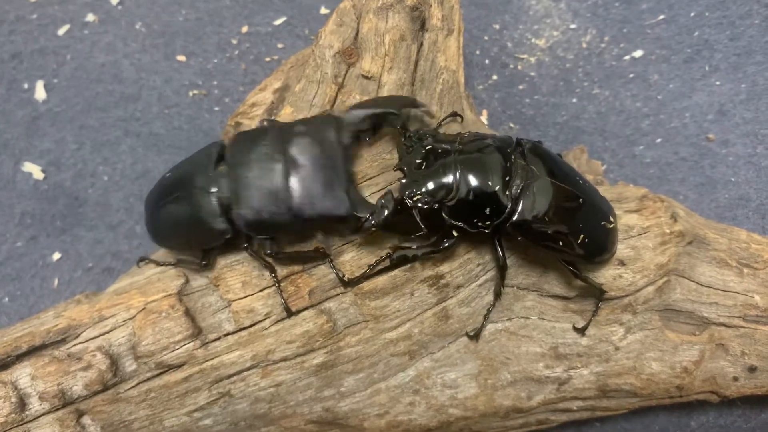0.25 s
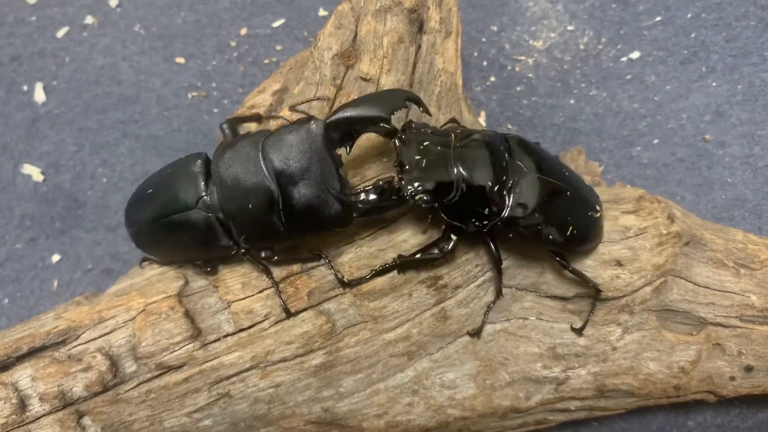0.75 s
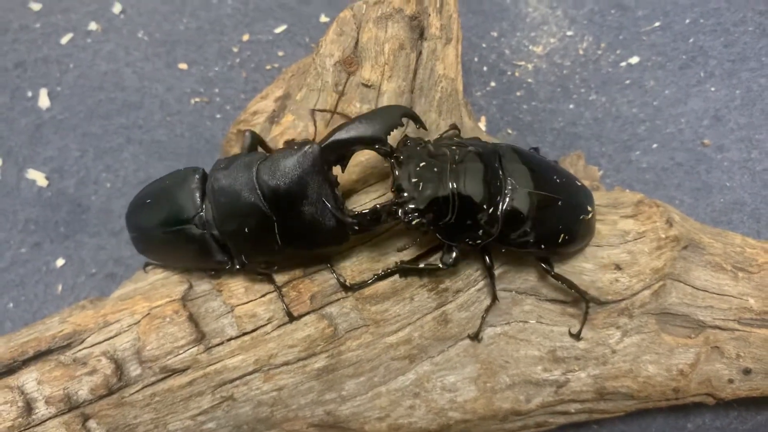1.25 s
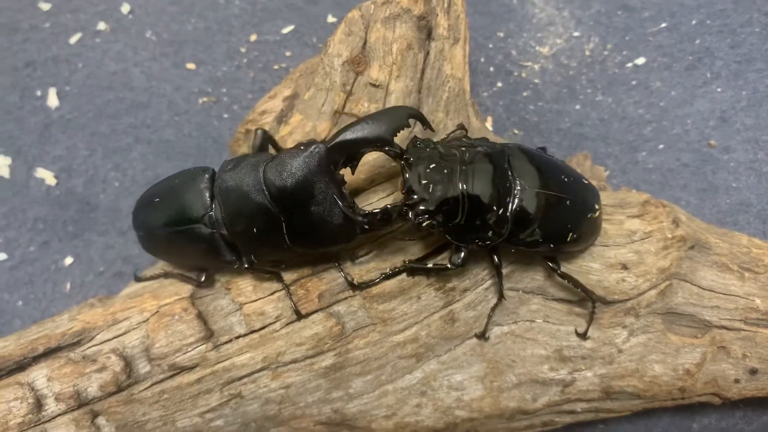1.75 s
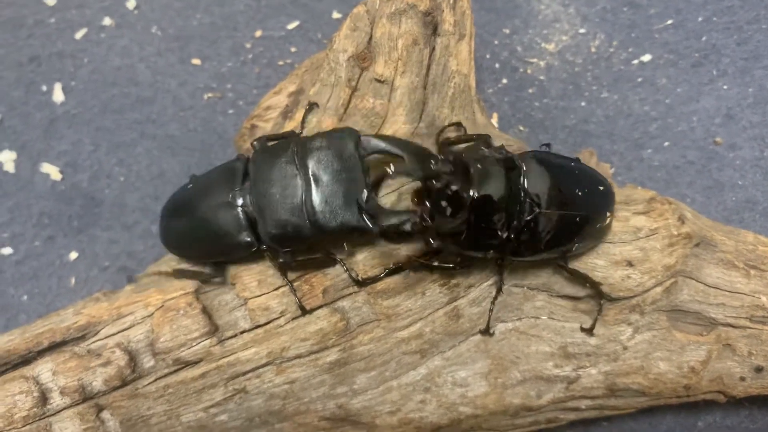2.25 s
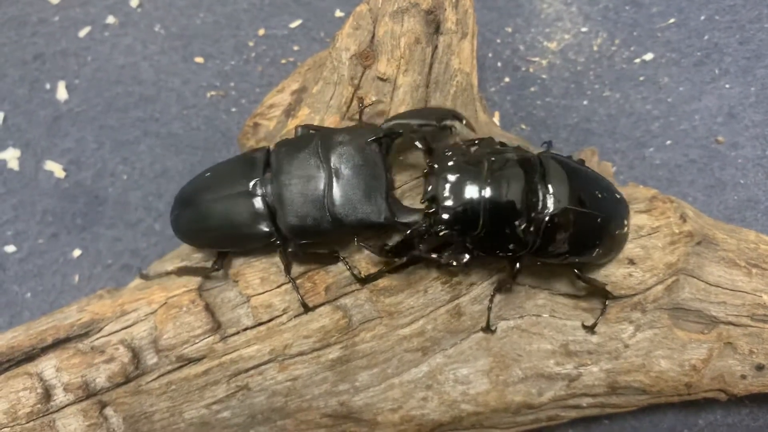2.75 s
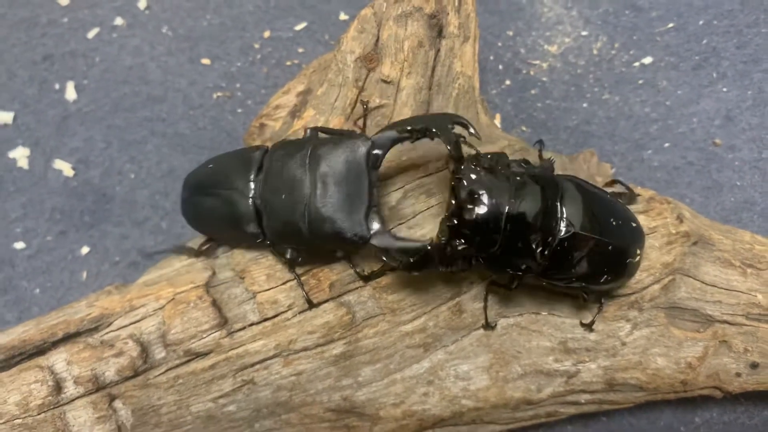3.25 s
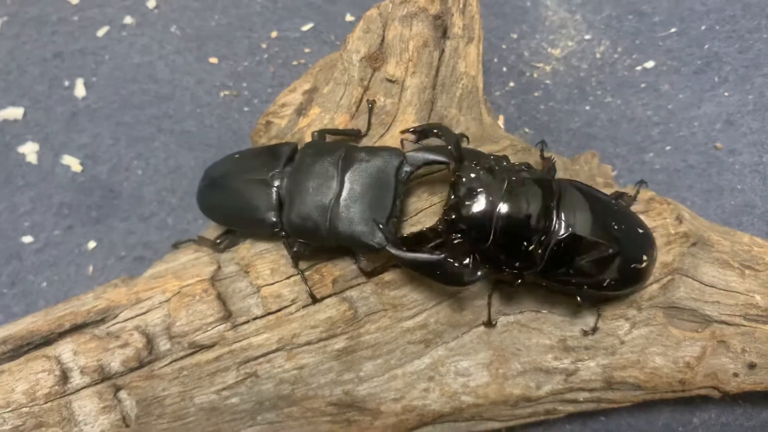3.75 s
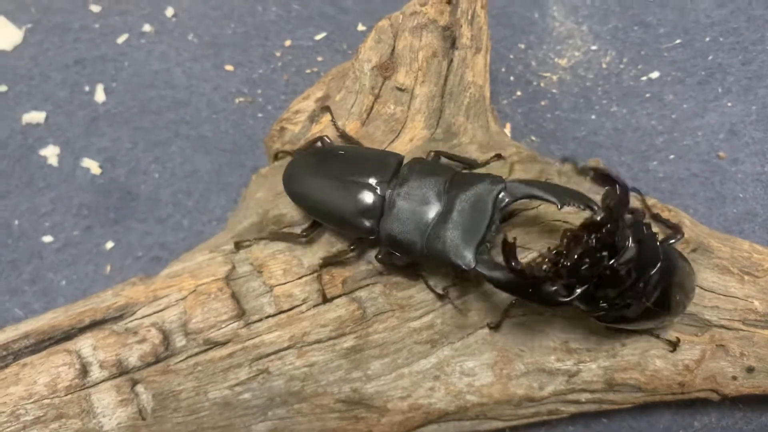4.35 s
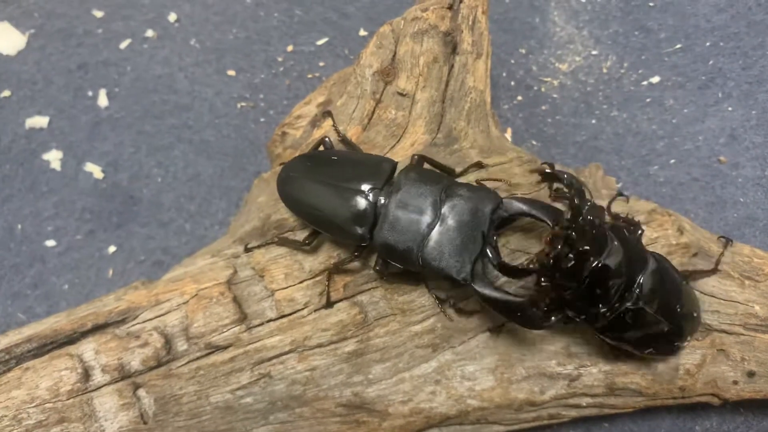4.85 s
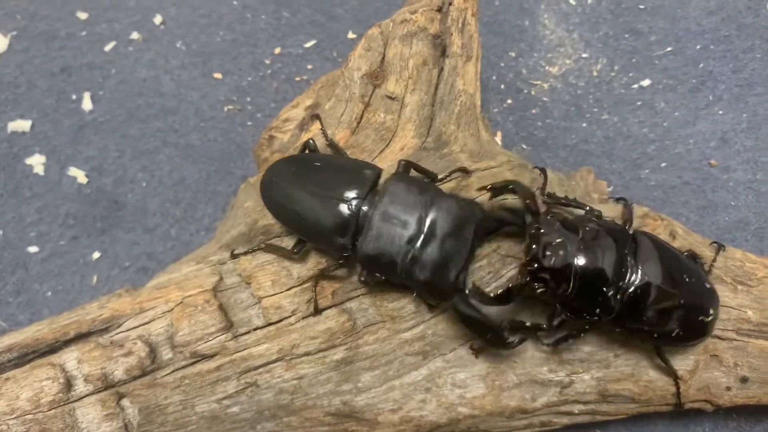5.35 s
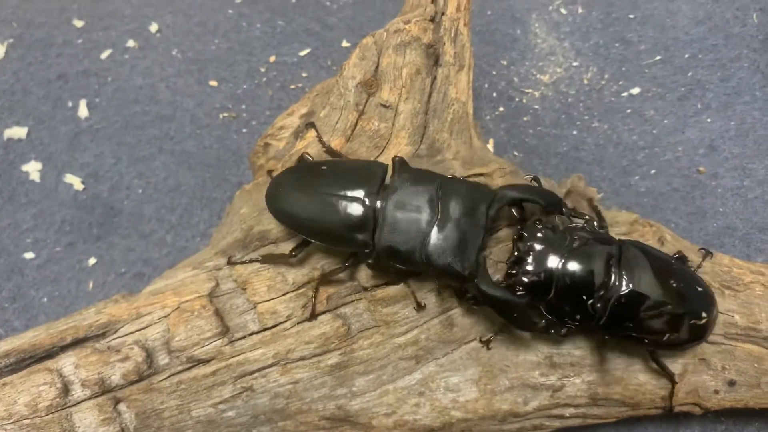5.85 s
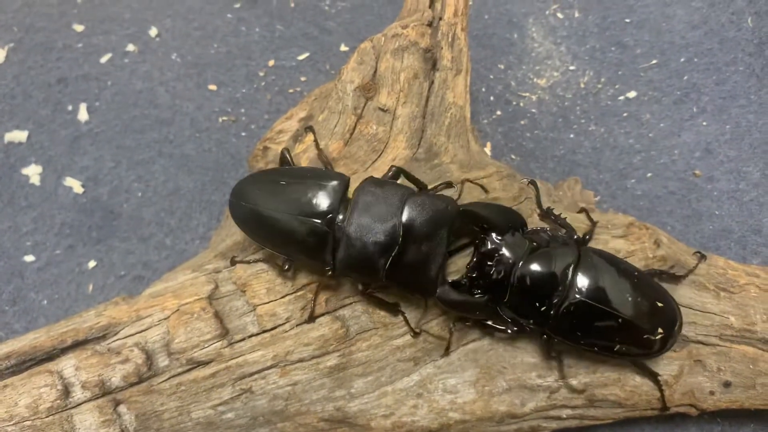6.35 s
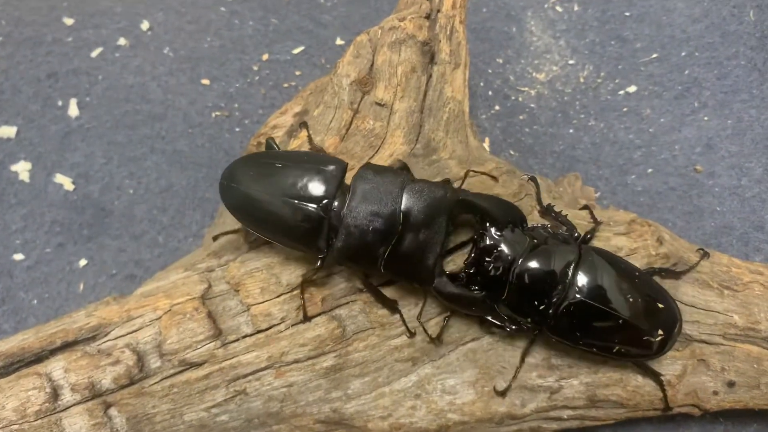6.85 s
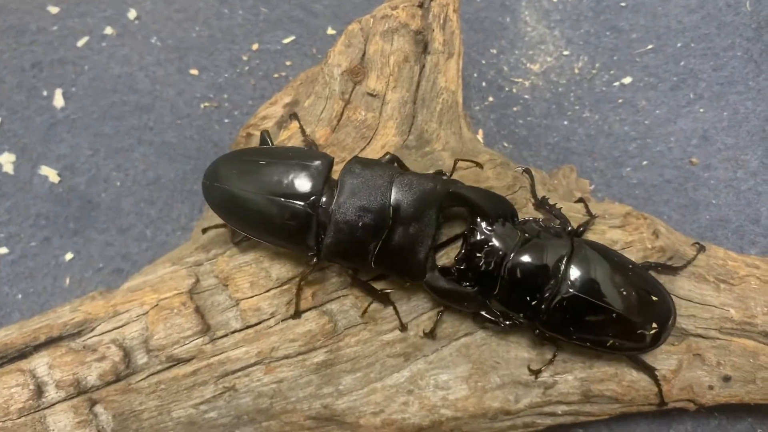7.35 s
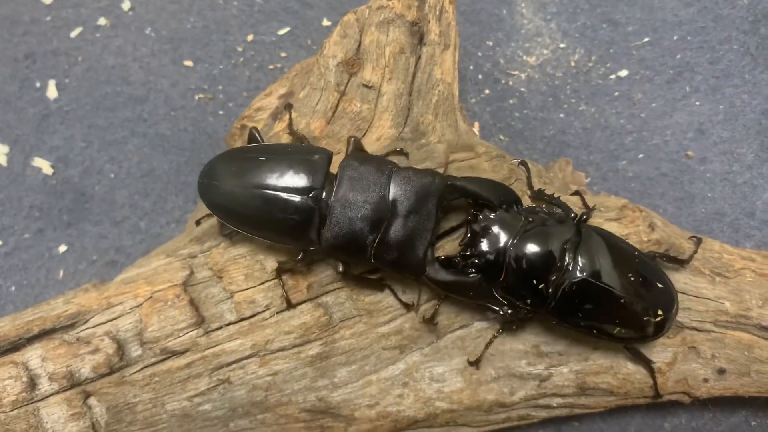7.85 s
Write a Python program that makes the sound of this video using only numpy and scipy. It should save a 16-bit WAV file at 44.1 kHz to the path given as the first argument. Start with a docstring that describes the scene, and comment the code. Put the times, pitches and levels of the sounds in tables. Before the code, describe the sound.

Two stag beetles grapple on dry wood, close to the microphone in a quiet room. Their jaws and shells crack together in a quick run of sharp, dry snaps, loudest in the first two seconds. Softer, scattered clicks follow, with claws ticking and scratching faintly on the grain and a few dull knocks and low thumps. A brief cluster of clicks comes near the end, over a faint hum and hiss.

```python
"""On dry wood in a quiet room, two stag beetles wrestle close under a phone.
Jaws and shells crack together; claws scratch by stick-slip, tick and squeak.
These forces excite the resonant modes of shell and wood, and the ceiling and walls reflect the sound.
Soft pushes knock on the wood and thump through the table, over a faint hum and the room's hush."""
import sys
import numpy as np
from scipy import signal
from scipy.fft import rfft, irfft, next_fast_len
from scipy.io import wavfile
from scipy.ndimage import uniform_filter1d

SR = 44100
rng = np.random.default_rng(int(sys.argv[2]) if len(sys.argv) > 2 else 0)


def store_wav(level_fs):
    """Save 16-bit WAV to argv[1]."""
    pcm = np.round(np.clip(np.atleast_2d(level_fs), -1, 1) * 32767)
    wavfile.write(sys.argv[1], SR, pcm.T.astype(np.int16))


N = 358091

# Spectrum of the hush: f/Hz, relative density/dB
HUSH_SPECTRUM = [(18, -35), (30, -19.5), (65, 3), (119, -9.5), (177, -6.5), (302, -25), (1330, -21.5),
                 (6900, -40), (8530, -44.5), (11400, -34), (13400, -55.5), (17000, -67)]
# Left-right likeness of the hush: f/Hz, coherence
HUSH_COHERENCE = [(60, 0.55), (250, 0.93), (700, 0.15), (1500, 0.03)]
# Bands of the hum: f/Hz, bandwidth/Hz, rms level/dB
HUM_BANDS = [(61, 22, -72), (174.44, 6.8, -74.5)]
# Claw drags: t/s, duration/s, claw level/dB, shell re claw/dB, wood re claw/dB
DRAGS = [(0.211, 0.056, -69.5, 5, 6.5), (0.3, 0.05, -72.5, 2.5, 7), (0.47, 0.11, -73.5, 14.5, 4),
         (0.582, 0.17, -60, 4.5, -2), (2.525, 0.049, -55, -9, 0.5), (2.604, 0.051, -54.5, -4, -2.5),
         (2.679, 0.055, -64, 1, -0.5), (2.742, 0.065, -65, 0.5, 5), (3.033, 0.097, -76, 4, 3),
         (3.321, 0.027, -72.5, 5.5, 7.5), (3.42, 0.048, -66.5, -6.5, 4), (3.713, 0.092, -81, 9.5, 9.5),
         (4.088, 0.086, -74.5, 3, 5), (4.257, 0.053, -66, 2.5, 6.5), (4.718, 0.025, -68.5, -1, 2.5),
         (4.925, 0.041, -73.5, 7, 4.5), (5.119, 0.086, -66, 2.5, 2), (5.17, 0.085, -66.5, 8.5, 6.5),
         (5.321, 0.13, -68, 5.5, -1), (5.791, 0.052, -78, 9.5, 5), (5.86, 0.035, -75, 6, 12),
         (6.008, 0.07, -78.5, 3, 16.5), (6.082, 0.1, -75.5, 7, -3), (6.169, 0.34, -87.5, 5, -4.5),
         (6.552, 0.49, -102, 3, 14), (7.66, 0.16, -85.5, 4.5, 8.5)]
# Jaw and shell cracks: t/s, snap level over 5 ms/dB, shell re snap/dB, wood re snap/dB
CRACK_EVENTS = [(0.255, -51.5, 0, -19), (0.3212, -52, -7, -28), (0.3285, -42.5, -11.5, -16.5),
                (0.3429, -54.5, -0.5, -2.5), (0.383, -69, 12.5, 8.5), (0.4553, -47.5, 0, -11),
                (0.499, -50, -3, -6.5), (0.5273, -31, -9, -27), (0.6324, -36, -19, -25),
                (0.646, -35, -12.5, -24.5), (0.6545, -37.5, -11, -17.5), (0.662, -30.5, -14, -22),
                (0.675, -29, -17, -33), (0.688, -34, -7, -14), (0.692, -39, -3.5, -22),
                (0.7, -41, -14, -24.5), (0.71, -22, -19.5, -34), (0.7193, -33, -11, -18),
                (0.7377, -24, -18, -32.5), (0.7393, -21.5, -14.5, -32.5), (0.755, -31.5, -12.5, -29.5),
                (0.7819, -24, -18, -21.5), (0.799, -28.5, -18, -36), (0.838, -25, -11, -31.5),
                (0.866, -59.5, 13.5, 6.5), (0.9321, -20, -13, -27), (1.131, -20.5, -17.5, -32.5),
                (1.1932, -49.5, -8.5, -7), (1.3106, -23, -16.5, -35.5), (1.4075, -36.5, -4.5, -18.5),
                (1.4256, -20, -23, -24.5), (1.4402, -32, -15.5, -15.5), (1.448, -45, -1, -12.5),
                (1.4634, -37.5, -9.5, -19), (1.5983, -27, -11, -25), (1.9754, -27, -13, -19),
                (1.9902, -27.5, -13, -16), (1.9986, -20.5, -15.5, -21.5), (2.01, -21.5, -15.5, -18.5),
                (2.154, -50, -7.5, -44), (2.173, -56, -0.5, -17), (2.4055, -50.5, -14.5, -20),
                (2.5446, -61, -7, -18), (2.5675, -50.5, -2.5, -21), (2.6036, -49.5, -8, -6),
                (2.6173, -45, -8, -12), (2.6566, -51.5, -8, -21), (2.698, -55.5, -9, 2.5),
                (2.7092, -49.5, -6, -7), (2.7981, -42, 0, -7), (3.05, -53, -0.5, 0), (3.243, -49, -3, -19),
                (3.334, -51, -6, -12), (3.34, -45.5, -12.5, -19), (3.3515, -39, -9.5, -13.5),
                (3.468, -37.5, -12.5, -14), (3.5192, -32.5, -2.5, -11), (3.6341, -49, -10, -7.5),
                (3.644, -44, -11.5, -13.5), (3.743, -47, -2, -7.5), (4.1325, -51.5, -6, -23),
                (4.271, -49.5, -4.5, -9), (4.281, -47, -6.5, -9), (4.542, -59, -8, -3.5),
                (4.588, -61.5, 3, 3), (4.6527, -68, 10.5, 10), (4.7309, -46, -4, -20),
                (4.9364, -65, -7.5, 3), (5.361, -61, 4.5, -2.5), (5.394, -43, -6.5, -24),
                (5.4211, -43.5, -11.5, -26), (5.4813, -41, -15, -20.5), (5.4865, -34, -21.5, -29),
                (5.87, -53.5, -12.5, -11.5), (5.908, -78, 15, -4.5), (5.952, -70.5, 12, 0.5),
                (6.0235, -71, 9.5, 3), (6.093, -62, -3.5, -6.5), (7.8962, -55.5, 0.5, -8),
                (7.9076, -45, -1.5, -17), (7.9554, -42.5, 0, -31)]
# Table thumps: t/s, peak level/dB
THUMP_EVENTS = [(0.45, -52.5), (1.328, -41.5), (1.831, -41), (2.017, -48.5), (2.359, -55), (3.054, -55),
                (3.441, -55.5), (3.818, -46), (4.854, -50), (4.974, -56), (5.127, -54), (5.327, -53)]
# Knocks on the wood: t/s, peak level/dB, contact time/ms
KNOCK_EVENTS = [(0.52, -51, 1.5), (0.74, -42, 1.43), (0.933, -51.5, 2), (2.01, -35, 1.28),
                (2.799, -42.5, 1.16), (3.005, -61.5, 2.7), (3.024, -57.5, 2.3), (3.037, -55, 2.5),
                (7.9585, -39, 0.28)]
# Claw ticks: t/s, peak level/dB
TICK_EVENTS = [(1.236, -49), (2.6797, -41.5), (2.7804, -54), (2.788, -38), (2.8255, -47), (3.0046, -46),
               (3.084, -49.5), (3.7903, -51.5), (3.841, -46), (4.047, -54.5), (4.11, -48.5), (4.2527, -48),
               (4.3615, -51), (4.3895, -50.5), (4.4194, -57), (4.4376, -49), (4.564, -50), (4.78, -51),
               (4.8262, -50.5), (5.038, -51.5), (5.091, -46.5), (5.6738, -55), (5.7069, -58),
               (5.7985, -59.5), (5.81, -56.5), (5.943, -51), (6.2751, -61.5), (6.3545, -60.5),
               (6.3854, -50.5), (6.4184, -54.5), (6.9142, -61.5), (7.0794, -58.5), (7.109, -65),
               (7.188, -61), (7.208, -58), (7.4245, -64.5), (7.672, -46.5), (7.7032, -46.5), (7.7526, -62),
               (7.7927, -59.5), (8.0306, -48.5)]
# Claw squeaks: t/s, duration/s, f/Hz, rms level at the crest/dB
SQUEAK_EVENTS = [(5.951, 0.067, 1250, -69), (7.792, 0.099, 1140, -75.5)]
# Resonances of claw, shell, wood, snapping joint and table: f/Hz, bandwidth/Hz, relative gain/dB
CLAW_MODES = [(8320, 4000, -2.5), (11405, 2000, 6.5), (14500, 5600, -2)]
SHELL_MODES = [(2465, 320, -8.5), (3071, 515, -1), (4516, 860, -1), (5510, 280, -2.5), (6370, 1200, -3.5)]
WOOD_MODES = [(260, 1300, -11.5), (530.4, 78, 6), (604, 310, 1.5), (855, 190, 5.5), (1250, 160, 7),
              (1959, 250, 6)]
SNAP_MODES = [(8155, 3080, 4.5), (9800, 4730, 4), (14900, 1800, -1)]
TABLE_MODES = [(43, 2.79, 2.5), (56.08, 1.27, 7), (66.28, 9.1, 3)]
# Weighting of the top three wood modes under a dragged claw: gain/dB
RASP_GAINS = [-4.5, -2, -2.5]
# Phase difference between the phone's two microphone ports: f/Hz, lead of the left/rad
PORT_LEAD = [(0, 0), (1200, 1.0), (3000, 3.2), (3900, 4.4), (6200, 5.3), (7200, 4.84), (17000, -7.73)]
# Level difference between the ports: f/Hz, left minus right/dB
PORT_SHADING = [(200, 1.5), (600, 3.5), (1400, 3), (2500, -1), (5000, -4), (7500, 3.5), (13000, -0.5)]

SIDE_DB = -5.5  # side (left-right difference) re mid (common part) for shell and wood


def undb(db):
    """Amplitude ratio of a level in dB."""
    return 10 ** (np.asarray(db) / 20)


def level(x, db):
    """Scaling to an rms level."""
    return x * undb(db) / np.sqrt(np.mean(x ** 2))


def ring(x, modes, shift_db=None):
    """Modal superposition: resonators keep the power of white noise; shift_db then weights each mode."""
    def bank(force, shifts):
        return sum((-1) ** k * undb(db + shifts[k])
                   * signal.lfilter(*signal.iirpeak(hz, hz / width, SR), force)
                   for k, (hz, width, db) in enumerate(modes))
    even = np.zeros(len(modes))
    impulse_response = bank(signal.unit_impulse(SR // 2), even)
    return bank(x, even if shift_db is None else shift_db) / np.sqrt(np.sum(impulse_response ** 2))


def wander(rate_hz):
    """Slow random modulation: held values, smoothed twice, with a spread near 1."""
    hold = int(SR / rate_hz)
    steps = np.repeat(rng.standard_normal(N // hold + 1), hold)
    return 4 / 3 * uniform_filter1d(uniform_filter1d(steps, hold), hold)[:N]


def bursts(starts, db, waves):
    """Linear superposition of transients, each at its own time and gain."""
    out = np.zeros(N + waves.shape[1])
    samples = (starts * SR).astype(int)[:, None] + np.arange(waves.shape[1])
    np.add.at(out, samples, undb(db)[:, None] * waves)
    return out[:N]


def blows(events, modes):
    """Pulse excitation: the longer a smooth push lasts, the lower the modes it can excite."""
    starts, db, push_ms = np.transpose(events)
    ms = np.arange(SR) * 1000 / SR
    force = np.sin(np.pi * np.clip(ms / push_ms[:, None], 0, 1)) ** 2
    rung = ring(force, modes)
    return bursts(starts, db, rung / np.max(np.abs(rung), axis=1, keepdims=True))


def hush(rms_db=-69.5, waver_db=0.03):
    """Partial coherence: room and microphone noise is alike left and right only in the bass."""
    size = next_fast_len(N)
    log_hz = np.log(np.fft.rfftfreq(size, 1 / SR) + 1)
    hz, db = np.transpose(HUSH_SPECTRUM)
    colour = undb(np.interp(log_hz, np.log(hz), db))
    hz, coherence = np.transpose(HUSH_COHERENCE)
    coherence = np.interp(log_hz, np.log(hz), coherence)
    mid, side = rfft(rng.standard_normal((2, size))) * colour * np.sqrt([1 + coherence, 1 - coherence])
    noise = irfft([mid + side, mid - side], size)[:, :N]
    return level(noise * undb(waver_db * wander(3.8)), rms_db)


def hum(side_db=-9):
    """Narrow-band noise: neighbouring frequencies beat, so the low hum wavers."""
    out = 0
    for hz, width, db in HUM_BANDS:
        mid, side = ring(rng.standard_normal((2, N)), [(hz, width, 0)])
        out += level(mid + undb(side_db) * np.array([side, -side]), db)
    return out


def scratches(slips_hz=2500, scatter_db=2.5, patchy_db=3, fidget_db=-98):
    """Stick-slip friction: dense, uneven slips on the grain excite claw, shell and wood (mid, side)."""
    t = np.arange(N) / SR
    effort = np.zeros((3, N))  # claw, shell, wood
    for start, length, db, shell_db, wood_db in DRAGS:
        edge = 0.24 * length
        part = slice(max(int((start - edge) * SR), 0), int((start + length + edge) * SR))
        inside = np.minimum(t[part] - start, start + length - t[part])
        swell = np.clip(inside / edge / 2 + .5, 0, 1) ** 2
        effort[:, part] += swell * undb(db + np.array([0, shell_db, wood_db]))[:, None]
    effort += undb(fidget_db + 6 * wander(22) + np.array([[0], [0], [10]]))  # the legs never quite rest
    slipping = rng.random(N) < slips_hz / SR
    slips = slipping * undb(scatter_db * rng.exponential(size=N) + patchy_db * wander(120))
    slips /= np.sqrt(uniform_filter1d(slips ** 2, SR // 25) + 1)  # evens the effort along a drag
    mid, side = level(slips * rng.standard_normal((2, 3, N)), 0) * effort
    # slips are too quick to move the lowest modes of the wood
    body_mid, body_side = [ring(shell, SHELL_MODES) + ring(wood, WOOD_MODES[3:], RASP_GAINS)
                           for _, shell, wood in (mid, side)]
    return np.array([ring(mid[0], CLAW_MODES) + body_mid, undb(SIDE_DB) * body_side])


def cracks(rise_ms=0.8, rattle_db=-9, shell_ms=2.9, wood_ms=1.8, wood_lag_ms=1.2, vary_db=1.5):
    """Impulse excitation: a joint snaps with a very quick rise, then rattles; shell and wood ring."""
    times, db, shell_db, wood_db = np.transpose(CRACK_EVENTS)
    ms = np.arange(-200, 900) * 1000 / SR
    starts = times + ms[0] / 1000
    splinters = np.exp(-(ms / 0.34 - 1) ** 2)
    rattle = undb(rattle_db) * np.exp(-np.maximum(ms, 0) / 2)
    snap = (splinters + rattle) * np.exp(np.minimum(ms, 0) / rise_ms)
    shell = np.exp(-np.abs(ms) / np.where(ms < 0, rise_ms, shell_ms))
    wood = np.exp(-np.abs(ms - wood_lag_ms) / wood_ms)
    force = rng.standard_normal((len(times), 2, 3, len(ms))) * [snap, shell, wood]
    force[:, :, 0, np.searchsorted(ms, .3)] = undb(14)  # the break itself is a single impulse
    # every crack strikes another spot, which weights the modes differently
    spot_db = vary_db * rng.standard_normal((len(times), len(SHELL_MODES))).T[:, :, None, None]
    # a sharp crack leaves the lowest modes of the wood still
    parts = [(SNAP_MODES, 0), (SHELL_MODES, shell_db), (WOOD_MODES[2:], wood_db)]
    mid, side = np.zeros((2, N))
    for k, (modes, relative_db) in enumerate(parts):
        is_body = k > 0  # shell or wood
        rung = ring(force[:, :, k], modes, is_body * spot_db)
        rung *= np.sqrt(0.005 * SR / np.sum(rung ** 2, axis=2, keepdims=True))  # unit rms over 5 ms
        mid += bursts(starts, db + relative_db, rung[:, 0])
        side += is_body * bursts(starts, db + relative_db + SIDE_DB, rung[:, 1])
    return np.array([mid, side])


def thumps(push_ms=14):
    """Structure-borne sound: slow pushes ring the table's bass modes, a little louder on the right."""
    pushes = [(start, db, push_ms) for start, db in THUMP_EVENTS]
    return blows(pushes, TABLE_MODES) * undb([[-.5], [.5]])


def knocks():
    """Damped free vibration: the wood rings dully after each brief push."""
    return blows(KNOCK_EVENTS, WOOD_MODES)


def ticks(decay_ms=0.95, vary_db=3):
    """Transient excitation: a claw tip lets go, and claw and leg give one dry click of varying colour."""
    starts, db = np.transpose(TICK_EVENTS)
    ms = np.arange(300) * 1000 / SR
    draws = rng.standard_normal((len(starts), len(ms) + len(SHELL_MODES)))
    force = draws[:, :len(ms)] * np.exp(-ms / decay_ms)
    colour_db = vary_db * draws[:, len(ms):].T[:, :, None]
    rung = ring(force, CLAW_MODES) + ring(force, SHELL_MODES, colour_db)
    return bursts(starts, db, rung / np.max(np.abs(rung), axis=1, keepdims=True))


def squeaks(width_hz=25):
    """Sharp resonance: driven at random, it gives the thin, unsteady tone of a slipping claw."""
    t, out = np.arange(N) / SR, 0
    for start, length, hz, db in SQUEAK_EVENTS:
        swell = np.sin(np.pi * np.clip((t - start) / length, 0, 1))
        out += swell * level(ring(rng.standard_normal(N), [(hz, width_hz, 0)]), db)
    return out


def room(x, ceiling_s=0.0145, ceiling_db=-17.5, t60_s=0.23, air_hz=4500, side_hz=6000):
    """Reflection and reverberation: the ceiling answers first, then the walls' sound dies exponentially."""
    late = np.arange(SR // 2) / SR - ceiling_s
    fade = undb(-60 * late / t60_s) * np.clip(late / .003 + .6, 0, 1)
    tail = rng.standard_normal((2, len(late))) * fade * undb(-12) / np.sqrt(np.sum(fade ** 2))
    echo = rng.standard_normal(len(late)) * np.exp(-(late / .0015) ** 2)  # an uneven ceiling smears it
    mid = signal.lfilter(*signal.butter(1, air_hz, fs=SR), tail[0])
    mid += undb(ceiling_db) * echo / np.sqrt(np.sum(echo ** 2))
    side = undb(-3) * signal.lfilter(*signal.butter(4, side_hz, fs=SR), tail[1])
    return x + signal.fftconvolve(x, [mid + side, mid - side], axes=1)[:, :N]


def ports(x):
    """Path difference and shading: each frequency reaches the two ports with its own phase and level."""
    size = next_fast_len(N)
    hz = np.fft.rfftfreq(size, 1 / SR)
    shading_db = np.interp(hz, *np.transpose(PORT_SHADING))
    lead = np.interp(hz, *np.transpose(PORT_LEAD))
    left = undb(shading_db / 2) * np.exp(0.5j * lead)
    return irfft(rfft(x, size) * [left, 1 / left], size)[:, :N]


def scene():
    """Superposition: the beetles' airborne sound, through room and ports, adds to thumps, hum and hush."""
    mid, side = cracks() + scratches()
    mid += ticks() + squeaks() + knocks()
    airborne = ports(room(np.array([mid + side, mid - side])))
    return airborne + thumps() + hum() + hush()


def record(dry, low_hz=27, top_hz=16700):
    """Band limiting: the phone cuts the deepest bass and the highest treble."""
    dry = signal.sosfilt(signal.butter(4, low_hz, "high", fs=SR, output="sos"), dry)
    return signal.sosfilt(signal.ellip(8, .2, 70, top_hz, fs=SR, output="sos"), dry)


dry = scene()
out = record(dry)
store_wav(out)
```